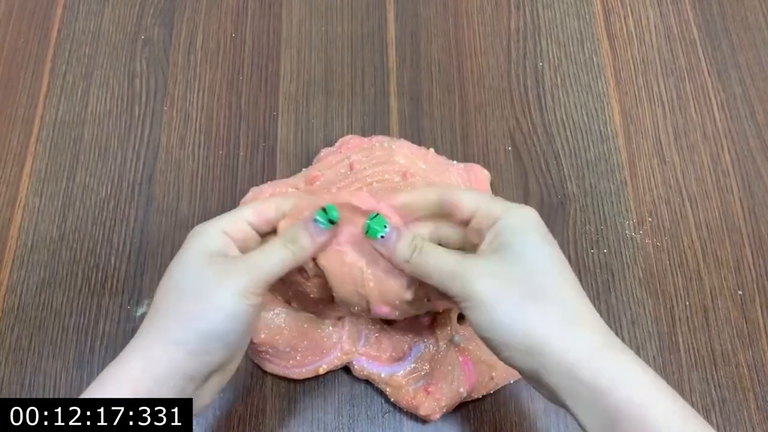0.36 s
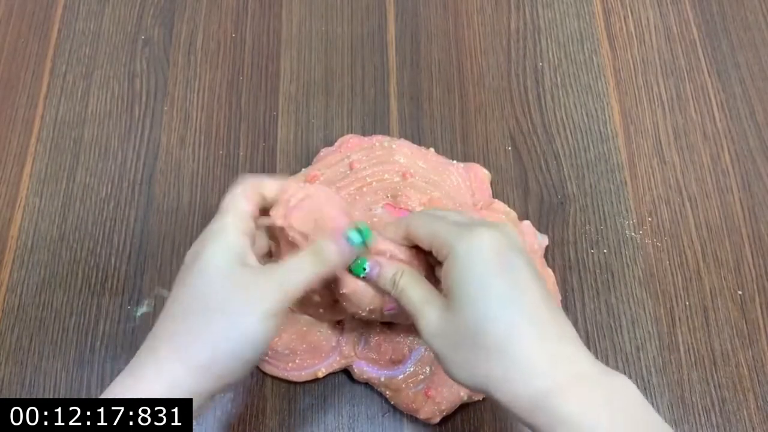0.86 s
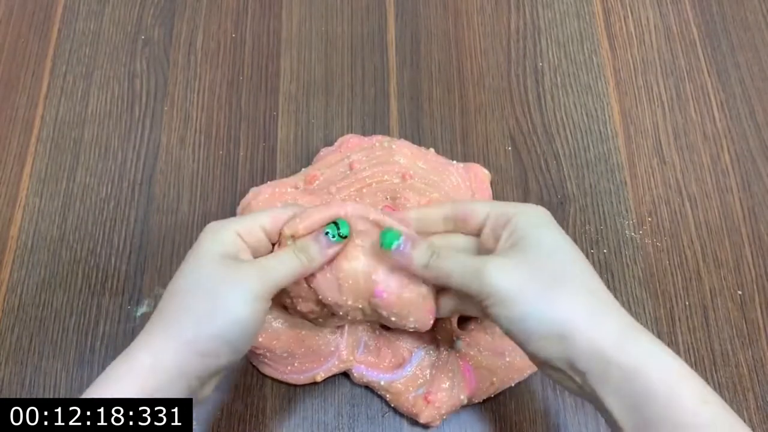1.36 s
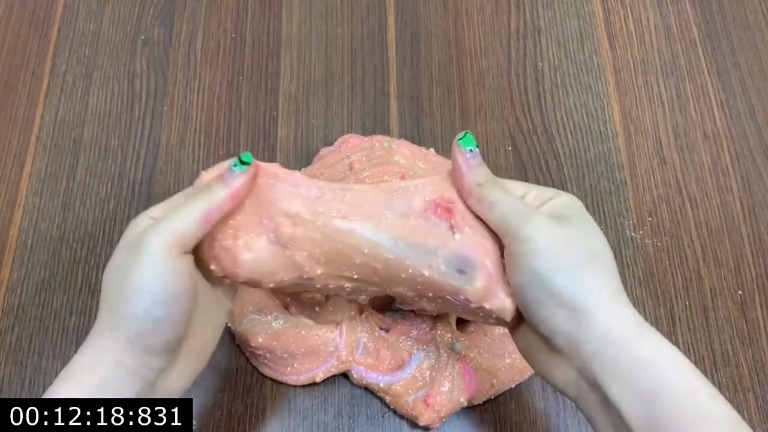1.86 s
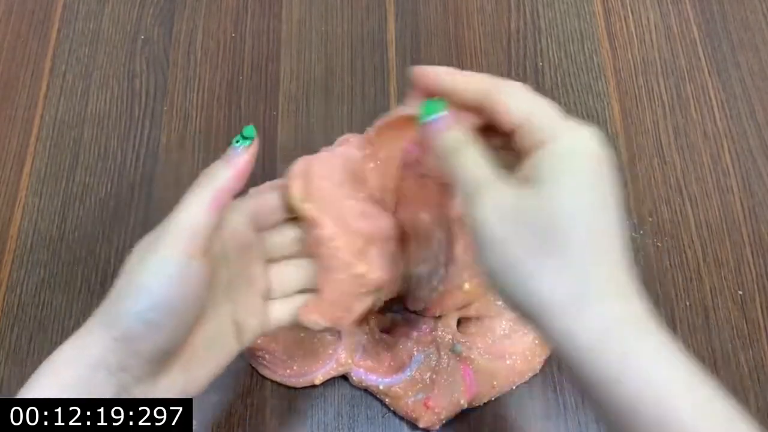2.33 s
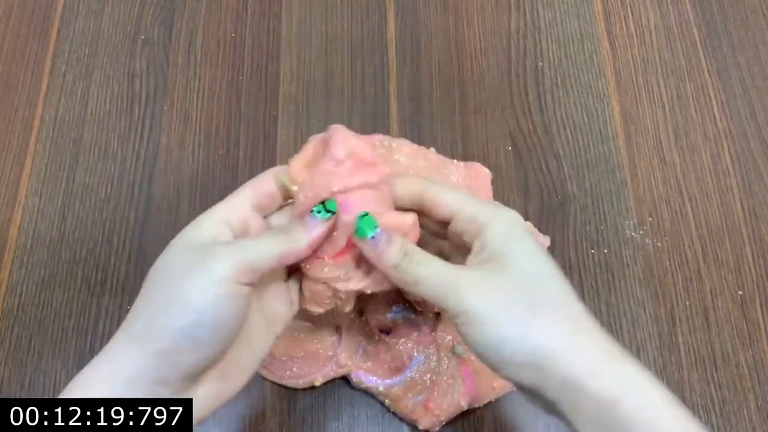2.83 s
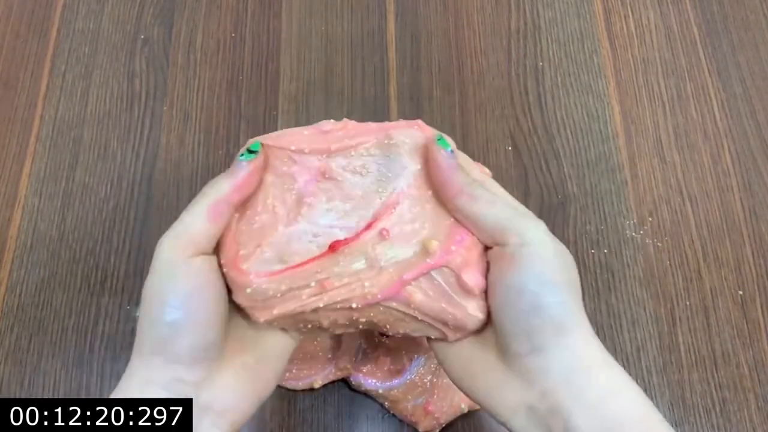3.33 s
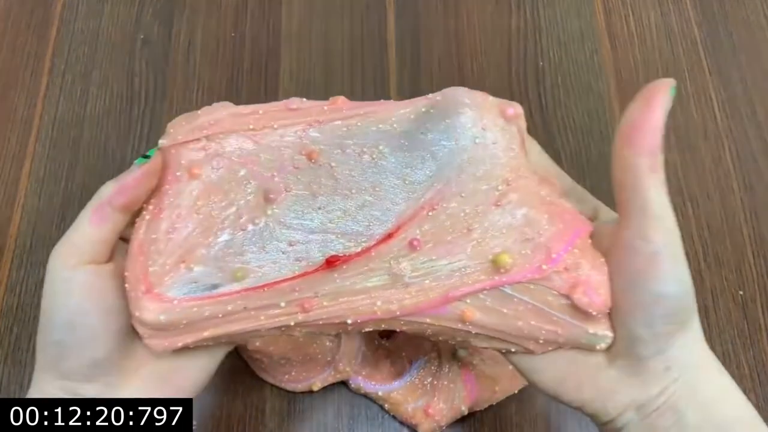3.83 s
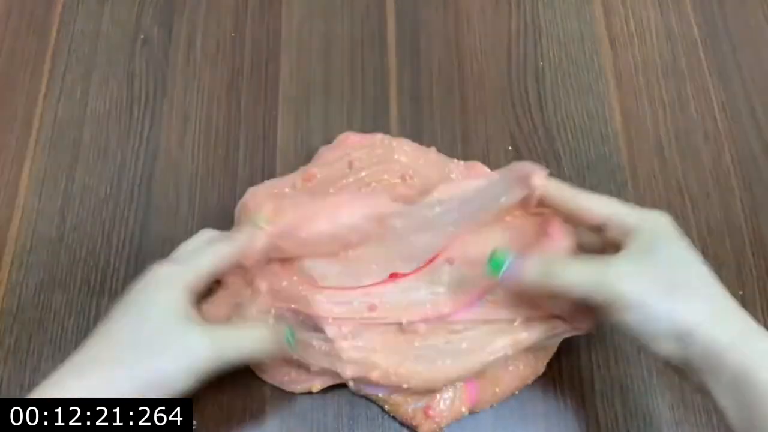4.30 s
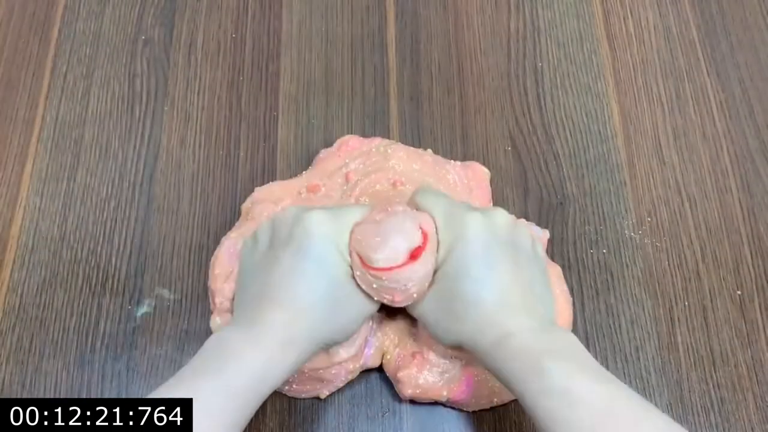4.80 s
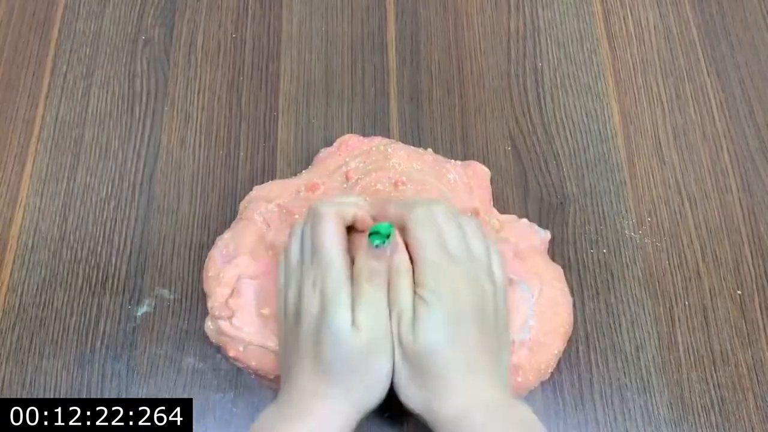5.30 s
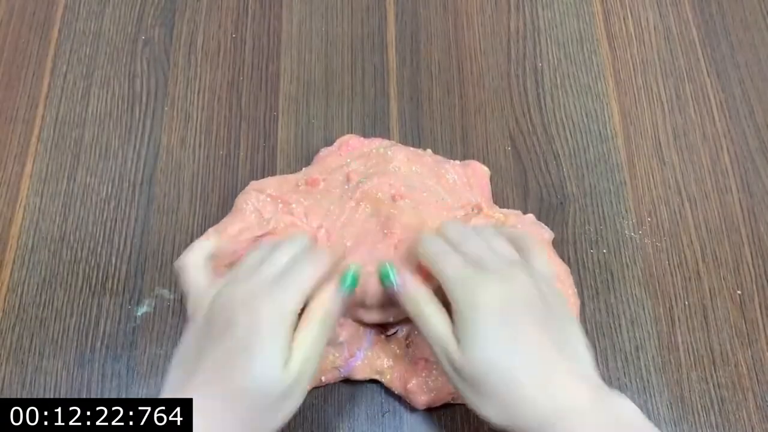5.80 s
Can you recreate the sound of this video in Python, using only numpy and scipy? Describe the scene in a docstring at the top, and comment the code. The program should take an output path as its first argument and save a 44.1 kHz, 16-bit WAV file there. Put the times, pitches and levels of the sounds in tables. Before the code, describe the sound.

Slime is stretched and folded by hand, mostly quiet, with delicate sticky ticks and small bubble pops over a soft hush. One brighter double snap stands out early. After a near lull around 4 s, folding and squeezing release thick wet crackles, muffled thumps and loud bursting air pockets, heaviest near the end. The microphone is very close; short reflections and a brief small-room tail surround the pops.

```python
"""Hands stretch, fold and press soft slime on a wooden table in a small quiet room.
First come sparse pops over a soft wet crackle, then a louder cluster near 1.4 s, scattered pops after it,
and from 4.4 s dense bursts and low thuds, loudest near 5.0 s and from 5.6 s to the end.
Pops are ringing cavities with noise snaps, crackle is many tiny rings, thuds and hush are shaped noise;
echoes, table modes and a diffuse tail follow the slime to a close pair of microphone ports."""
import sys
import numpy as np
from scipy import signal
from scipy.fft import rfft, irfft, next_fast_len
from scipy.io import wavfile
from scipy.ndimage import uniform_filter1d

SR = 44100
rng = np.random.default_rng(int(sys.argv[2]) if len(sys.argv) > 2 else 0)


def gain_from_decibels(decibels):
    """Convert decibel values to linear amplitude factors."""
    exponent = np.asarray(decibels, float) / 20
    return 10 ** exponent


def transcribe(signal):
    """Save signal, clipped to [-1, 1], as a 16-bit WAV file at the path in sys.argv[1]."""
    frames = np.atleast_2d(signal).T
    limited = np.clip(frames, -1, 1)
    pcm = np.round(limited * 32767).astype(np.int16)
    wavfile.write(sys.argv[1], SR, pcm)


N = 260631  # samples

# Bursting air pockets: (time [s], cavity ring level [dB], cavity pitch [Hz],
# peak of the torn film's snap [dB], left-right ring difference, held within 8 either way [dB])
POCKETS = [(0.1826, -57, 1470, -39.5, 2), (0.2648, -48, 2490, -45.5, 2), (0.2854, -41.5, 1270, -39, 1),
           (0.289, -40.5, 2440, -50, 3), (0.319, -48, 1850, -45, 9), (0.361, -40, 1130, -61, 9),
           (0.4846, -33, 13500, -38, 2), (0.501, -37.5, 3600, -34, -6), (0.488, -43, 3180, -30, 6),
           (0.537, -45, 2470, -49, 1), (0.997, -48, 1380, -37, 7), (1.0616, -55, 3000, -38, 2),
           (1.134, -51, 10500, -42, 0), (1.168, -45, 9500, -56, -1), (1.276, -58, 2080, -60, 3.5),
           (1.3737, -54, 4620, -37, 6), (1.3778, -19, 13300, -31.5, -1), (1.444, -18.5, 1406, -27, 17),
           (1.4462, -21.5, 1155, -24, -3), (1.447, -29, 930, -50, 0), (1.447, -30, 2320, -48, 2),
           (1.679, -39.5, 1080, -44, 7), (1.687, -40.5, 1620, -32, 6), (1.694, -41, 1140, -33, -3),
           (1.9128, -48, 1440, -44.5, 9), (2.1074, -49, 1150, -46, 6.5), (2.313, -56.5, 2060, -44.5, 1.5),
           (2.3979, -35.5, 5550, -38, 10.5), (2.402, -37, 14000, -46, 1.5), (2.4071, -43, 14000, -50, 1),
           (2.597, -57.5, 2520, -44.5, 0), (2.645, -56, 2460, -51.5, 3.5), (2.7543, -42, 13500, -45.5, 2.5),
           (2.796, -50, 4600, -45, 10), (2.837, -48, 2740, -49.5, 6.5), (2.841, -38.5, 2780, -50, 14),
           (2.885, -38.5, 3600, -40.5, 2), (2.8868, -45.5, 2450, -37, -1), (3.0199, -33, 3120, -30, 8.5),
           (3.0198, -39, 1630, -26, 7), (3.2564, -55, 1730, -59, 27), (3.426, -52.5, 1320, -47, 8),
           (3.522, -48.5, 5350, -46.5, 9), (3.625, -62, 2680, -41.5, 5), (3.686, -35.5, 2500, -35, 12),
           (3.6882, -51, 1260, -62, -2), (3.7683, -49, 1140, -62.5, 3), (3.839, -55, 1180, -49, 2.5),
           (3.8526, -60, 1880, -43, 15), (4.271, -48, 3230, -67, 3), (4.3795, -47, 13500, -41, 2),
           (4.431, -51, 1700, -35, 5), (4.437, -39.5, 1590, -25, 2), (4.445, -45, 1760, -51, 10),
           (4.463, -39, 1460, -54, -3), (4.473, -39.5, 1330, -50, -5), (4.5137, -55, 390, -40.5, -1),
           (4.524, -38, 1980, -46, 5), (4.586, -42, 2000, -44.5, 7), (4.6635, -44, 1800, -40, 7),
           (4.698, -60, 3100, -25.5, 11), (4.711, -57, 5170, -27, 2), (4.7735, -48, 3700, -30, -3),
           (4.778, -37, 840, -43, -1), (4.801, -44.5, 2500, -27, 0), (4.813, -27, 13500, -26, 3),
           (4.827, -22, 1500, -20, 3), (4.828, -24.5, 800, -27, -2), (4.833, -24.5, 2500, -24, 5),
           (4.833, -31, 430, -42.5, -5), (4.846, -22.5, 3080, -30, 3), (4.857, -21.5, 3300, -25.5, -1),
           (4.914, -29, 3200, -26, 2.5), (4.9292, -15, 3050, -22, -2), (4.9389, -23, 3420, -22.5, 9.5),
           (4.933, -33, 338, -40, -2), (4.9662, -25, 13000, -29, 0), (4.9727, -17, 9900, -19, 2),
           (4.9915, -34.5, 430, -28, -1), (5.0209, -6, 1480, -4, -1), (5.0225, -16, 488, -40, 1.5),
           (5.0226, -8, 1280, -3, 8), (5.0253, -20.5, 840, -22, -2), (5.255, -26, 2650, -23, 4),
           (5.27, -32, 2730, -31, 2), (5.282, -39, 2480, -42, 1), (5.5505, -31.5, 13000, -35, -1),
           (5.555, -32.5, 990, -46, -2), (5.5647, -25.5, 1130, -22, 2), (5.5655, -26, 470, -24.5, -1),
           (5.6089, -9.5, 1770, -5, 3), (5.6098, -23.5, 550, -36, 0), (5.6111, -17.5, 1460, -5, 0),
           (5.6191, -4.5, 4220, -9, -12), (5.619, -18, 468, -27, -1.5), (5.6245, -17.5, 700, -32, -1),
           (5.627, -29, 1160, -30, 0), (5.6435, -29, 13500, -36, 1), (5.685, -27, 13000, -26, 1),
           (5.6894, -27.5, 870, -17, 4.5), (5.7262, -16, 4230, -18, 7), (5.7303, -28, 2520, -11, 8),
           (5.7392, -4, 2270, -8, 3), (5.7412, -14.5, 460, -29, -0.5), (5.7419, -5, 2200, -3, -1),
           (5.7425, -17.5, 705, -32, -1), (5.7514, -7, 12400, -4, -1), (5.7545, -32, 457, -11, 0)]


def pops():
    """Cavity resonance: each pocket rings while its film tears in a short bright snap of noise."""
    snap_likeness, snap_decay_s, snap_band_hz = 0.87, 0.00046, (6000, 16000)
    cycles_at_1khz, cycles_per_octave = 0.73, 0.97  # ringing cycles; factor per octave up
    cycles_per_20_db = 1.61  # gentler pops ring longer by this factor
    out = np.zeros((2, N + SR))
    t = np.arange(400) / SR
    bright = signal.butter(1, snap_band_hz, "band", fs=SR, output="sos")
    noises = rng.standard_normal((len(POCKETS), 2, 400))
    for (s, db, hz, snap_db, pan_db), noise in zip(POCKETS, noises):
        at = round(s * SR)
        half_db = np.clip(pan_db, -8, 8) / 2
        cycles = cycles_at_1khz * cycles_per_octave ** np.log2(hz / 1000)
        cycles *= cycles_per_20_db ** (-db / 20)
        # each pop carries little sound below its own pitch
        radiation = signal.butter(4, 0.61 * hz, "high", fs=SR, output="sos")
        ring = signal.sosfilt(radiation, bubble(hz, cycles))
        noise = np.array([noise[0], partly_alike(noise[0], noise[1], snap_likeness)])
        snap = signal.sosfilt(bright, noise * t * np.exp(-t / snap_decay_s))
        out[:, at:at + len(ring)] += gain_from_decibels([[db + half_db], [db - half_db]]) * ring
        out[:, at:at + 400] += gain_from_decibels(snap_db) * snap / abs(snap).max()
    return out[:, :N]


# Pulls, folds and squeezes: (peak time [s], relative crackle level [dB], build by 20 dB [s],
# die by 20 dB [s], wetness as tilt toward the bass [dB per octave]);
# a build or die under .01 s, zero and negative included, acts as .01 s: a nearly abrupt start or stop
KNEADING = [(0.052, -72.5, 12.5, 0.36, 7), (0.189, -58.5, 0.07, 0, 5.5), (0.29, -57, 0.1, 0.09, 5),
            (0.471, -56, 0.06, 0.08, -2.5), (0.501, -48, 0.05, 0.07, 0.5), (0.536, -47.5, 0.09, -0.0333, 1),
            (0.655, -64, 0.13, 0.05, 2.5), (0.974, -53.5, 0.01, 0.22, 0), (1.053, -48.5, 0.08, 0.06, 1),
            (1.139, -60.5, 0.2, 0.02, -0.5), (1.344, -59.5, 0.02, 0.14, -2), (1.379, -48.5, 0.06, 0, -1.5),
            (1.446, -41.5, 0.0131, 0.0443, 2.5), (1.479, -51.5, 0.014, 0.37, 6),
            (1.682, -57, 0.12, 0.14, 8.5), (1.689, -45.5, -0.02, 0.03, -5), (1.845, -60, 0.1, 0.1, -3),
            (1.936, -50, 0.03, 0, -3), (2.082, -59.5, -0.08, 0.06, 5), (2.123, -59.5, 0.32, 0, 5),
            (2.32, -61.5, 0.1, 0.14, -2.5), (2.368, -53.5, 0.04, 0.11, 1.5),
            (2.405, -50.5, 0.02, -0.04, -3), (2.6, -64.5, 0.1, 0.4, 2.5), (2.67, -56, 0.1, 0.11, 0),
            (2.795, -52.5, 0, 0.29, -2), (2.847, -50.5, -0.03, 0, -0.5), (2.981, -55, 0.15, 0.08, -1),
            (3.096, -50.5, 0, 0.07, 2), (3.199, -57, 0.05, 0.12, 1), (3.278, -58.5, 0.15, 0.12, 2),
            (3.38, -64.5, 0.04, 0.25, -2.5), (3.426, -57, -0.08, 0.11, 0), (3.529, -64, .07, 0.1, 4.5),
            (3.611, -61, 0.015, 0.12, -3), (3.689, -55, 0.03, 0.04, 2.5), (3.85, -51.5, 0.025, 0.07, 1.5),
            (4.14, -71.5, 0.2, -0.2, 5), (4.28, -66, 0.23, 0, 6.5), (4.35, -71.5, 0.4, 0.5, -8.5),
            (4.43, -42, 0.0158, 0, 1.5), (4.521, -46.5, 0.1, 0.03, 5.5), (4.581, -42.5, 0.08, -0.03, 1),
            (4.7, -50.5, 0.09, 3.5, 5.5), (4.77, -46, 0.02, 0.2, -1), (4.838, -32.5, -0.01, 0.04, 4.5),
            (4.875, -38, 0.05, 0.07, 4), (4.93, -36.5, 0.0631, 0.16, 3.5), (5.0, -45, 0.16, 0.43, -7.5),
            (5.08, -35.5, 0.1, 0.02, 0.5), (5.202, -34, 0.19, -0.02, 3), (5.233, -28.5, 0.0955, 0.08, 4),
            (5.285, -32.5, 0.1756, -0.01, 4), (5.33, -50, 0.18, -0.14, 4), (5.565, -33, -0.05, 0.1, 0),
            (5.616, -26, -0.0053, 0.25, 3), (5.67, -32.5, 0, 0.25, -3),
            (5.729, -19.5, -0.0018, 0.0344, 2.5), (5.754, -26, -0.0035, 0.05, -2),
            (5.81, -36.5, 0.06, 0.6, 2.5)]
# Relative spectrum of the tiny bubbles: (frequency [Hz], level [dB per Hz])
CRACKLE_SPECTRUM = [(200, -21.5), (400, -22.5), (850, -22), (1200, -11), (2000, -12), (3000, -8.5),
                    (4400, -10.5), (7500, -5.5), (10000, -9), (13000, -12), (15500, -4.5)]


def crackle():
    """Random point process: tiny bubbles burst in clumps under each stroke; wetter slime favours low ones."""
    bursts_per_s, rest_db = 11000, -93.5  # rate before the pitch weighting; crackle at rest
    spread_db, clump_db = 3.5, 2.5  # scatter of bubble sizes; bunching in time
    patch_db, patch_s = 3, 0.039  # neighbouring sizes come and go together
    power = strokes(*np.transpose(KNEADING)[:4])
    total = power.sum(0) + gain_from_decibels(2 * rest_db)
    crackle_db = at_samples(10 * np.log10(total))
    wet_db = at_samples(np.transpose(KNEADING)[4] @ power / total)
    clumps = evened(uniform_filter1d(uniform_filter1d(rng.standard_normal(N), 200), 200))
    pitches = np.geomspace(220, 15500, 36)
    width = max(round(patch_s * SR / 64), 1)
    patches = uniform_filter1d(rng.standard_normal((N // 64 + 1, len(pitches))), size=6, axis=1)
    patches = uniform_filter1d(uniform_filter1d(patches, width, axis=0), width, axis=0)
    patches = evened(patches).T
    out = np.zeros((2, N))
    for hz, patch in zip(pitches, patches):
        often = bursts_per_s / len(pitches) * (hz / 2500) ** .7  # small bubbles are the most common
        at = np.flatnonzero(rng.random(N) < often / SR)
        size_db = spread_db * np.minimum(rng.exponential(1, len(at)), 4)
        size_db += clump_db * clumps[at] + patch_db * patch[at // 64]
        level_db = crackle_db[at] + read(CRACKLE_SPECTRUM, hz) + size_db
        level_db += wet_db[at] * np.log2(4000 / hz)
        # bubbles lie left and right
        side_db = 6.0 * (1 - likeness(hz)) * rng.standard_normal(len(at))
        # some below 8 kHz reach the right port a sample late
        lag = rng.integers(0, 3, len(at)) // 2 * (hz < 8000)
        late = np.minimum(at + lag, N - 1)
        train = np.zeros((2, N))
        train[0, at] = gain_from_decibels(level_db + side_db) * np.sqrt(hz / often)
        train[1, late] = gain_from_decibels(level_db - side_db) * np.sqrt(hz / often)
        grain = bubble(hz, 3.5)
        grain = grain / np.linalg.norm(grain)
        out += signal.oaconvolve(train, grain[None], axes=1)[:, :N]
    return gain_from_decibels(-3.5) * out


def bubble(hz, cycles, rise=0.043):
    """Damped oscillation: a small cavity rings down, its pitch rising as it opens; peak 1."""
    cycles = max(cycles, .3)
    turns = np.arange(int(SR * (cycles * 3 + 1) / hz)) * hz / SR
    fade = (1 - np.exp(-turns * 4)) * np.exp(-turns / cycles)
    ring = fade * np.sin(2 * np.pi * turns * (1 + rise * turns / cycles))
    return ring / abs(ring).max()


# Wet folds closing: (peak time [s], squelch level [dB], die by 20 dB [s]);
# a die under .01 s acts as .01 s, a nearly abrupt stop
FOLD_CLOSINGS = [(0.45, -73.5, 0.8), (1.7, -56, 0.21), (2.12, -61.5, 0.07), (2.63, -68, 0.38),
                 (2.86, -60, 0), (3.87, -57, 0.08), (4.23, -67.5, 0.2), (4.48, -50, 0.085),
                 (4.56, -47, 0.1), (4.68, -55.5, 0.04), (4.79, -51.5, 0.1), (4.94, -46, 0.1),
                 (5.02, -36.5, 0.08), (5.1, -52.5, 0.22), (5.22, -35.5, 0.14), (5.64, -44.5, 0.32),
                 (5.74, -35, 0.0758), (5.91, -54, 0.5)]
# Relative squelch spectrum: (frequency [Hz], level [dB per Hz])
SQUELCH_SPECTRUM = [(100, -24.5), (170, -3.5), (280, 3), (430, 0.5), (600, -3), (1000, -10.5),
                    (2000, -57.5)]


def squelch():
    """Shaped noise under an envelope: wet folds squelch as they close."""
    return leaning(FOLD_CLOSINGS, -77) * shaped_noise(SQUELCH_SPECTRUM, 2048)


# Arms leaning on the table top: (peak time [s], rumble level [dB], die by 20 dB [s]);
# a die under .01 s, zero and negative included, acts as .01 s, a nearly abrupt stop
ARM_BUMPS = [(0.1, -68, 0.5), (0.67, -70, 0.5), (1.0, -66, -0.1), (1.68, -64.5, 0.96), (2.12, -55.5, 0.1),
             (2.57, -55, 0.18), (2.63, -57.5, 0.07), (2.68, -60, 0.12), (2.88, -59, 0.14),
             (3.05, -66.5, 1.4), (3.865, -60, 0.06), (3.925, -51, 0.06), (4.23, -63.5, 0.9),
             (4.55, -50, 0.08), (4.62, -53, 0.04), (4.87, -57, 0.2), (5.31, -44, 0.23),
             (5.355, -47.5, 0.22), (5.4, -56.5, 0.05), (5.7, -54.5, 0.2), (5.82, -64.5, 0)]
# Relative rumble spectrum: (frequency [Hz], level [dB per Hz])
RUMBLE_SPECTRUM = [(12, -33), (20, -0.5), (50, 2.5), (75, -5), (130, -12.5), (210, -42), (350, -120)]


def rumble():
    """Structure-borne sound: the arms' weight rumbles through the wood as low noise."""
    return leaning(ARM_BUMPS, -73.5) * shaped_noise(RUMBLE_SPECTRUM, 2048)


# Palms pressing flat: (peak time [s], boom level [dB], die by 20 dB [s])
PALM_PRESSES = [(4.52, -46, 0.1356), (4.61, -49.5, 0.13), (4.99, -51, 0.26), (5.05, -52, 0.33)]
# Relative boom spectrum: (frequency [Hz], level [dB per Hz])
BOOM_SPECTRUM = [(70, -32), (105, 1.5), (140, -30.5)]


def boom():
    """Low resonance as narrow-band noise: the whole table booms under flat palms."""
    return leaning(PALM_PRESSES, -99) * shaped_noise(BOOM_SPECTRUM, 2048)


def leaning(rows, rest_db):
    """Summed stroke power, as a gain: loads build in 0.56 of their dying time, neither under .01 s."""
    s, db, die_s = np.transpose(rows)
    power = strokes(s, db, 0.56 * die_s, die_s).sum(0)
    return at_samples(np.sqrt(power + gain_from_decibels(2 * rest_db)))


def strokes(s, db, build_s, die_s):
    """Exponential growth and decay: each stroke's power moves straight in dB to and from its peak."""
    t = np.arange(0, N + 64, 64)[:, None] / SR - s
    # shorter times act as .01 s: a nearly abrupt start or stop
    dying = t / np.maximum(die_s, .01)
    building = -t / np.maximum(build_s, .01)
    return gain_from_decibels(2 * (db - 20 * np.maximum(dying, building))).T


def at_samples(v):
    """Linear interpolation of values given every 64 samples."""
    return np.interp(np.arange(N), np.arange(len(v)) * 64, v)


# Table-top modes: (frequency [Hz], relative level [dB], time to die by 60 dB [s])
TABLE_MODES = [(289, -18, 0.43), (505, -16.5, 0.4), (630, -26.5, 0.16), (795, -25.5, 0.33)]


def table(x):
    """Modal resonance: the table top rings briefly on its modes under the bursting slime."""
    t = np.arange(SR // 2) / SR
    ring = sum(gain_from_decibels(db - 60 * t / t60) * np.sin(2 * np.pi * hz * t) for hz, db, t60 in TABLE_MODES)
    return gain_from_decibels(-39.0) * signal.fftconvolve(x, ring)[:N]


# Echoes off table and hands, one list for the left and one for the right: (delay [s], level [dB])
NEAR_ECHOES = [
    [(.0013, -30.5), (.0027, -8), (.0042, -6)],
    [(.0017, -13.5), (.0031, -41), (.0049, -12)],
]


def nearby(x):
    """Early reflection: table top and hands return dulled echoes, unlike on both sides."""
    dull = signal.sosfilt(signal.butter(1, 7000, fs=SR, output="sos"), x)
    out = np.zeros((2, N))
    for side, echoes in enumerate(NEAR_ECHOES):
        for s, db in echoes:
            lag = round(s * SR)
            out[side, lag:] += gain_from_decibels(db) * dull[:N - lag]
    return out


# Reverberation time: (frequency [Hz], time to die by 60 dB [s])
ROOM_T60 = [(250, .35), (1000, .42), (2500, .4), (6000, .33), (12000, .24), (15000, .17)]
# Reverberant energy against the direct sound: (frequency [Hz], level [dB])
ROOM_ENERGY = [(300, -12.5), (600, -10), (900, -4.5), (1500, -7.5), (3000, -6.5), (4000, -6), (5300, -7),
               (8000, -9), (12000, -13)]


def room(x):
    """Reverberation: sparse random-sign taps swell, then die band by band, partly alike on both ports."""
    swell_s = .012
    taps = np.zeros((2, SR // 2))
    at = np.arange(120, SR // 2 - 20, 20)
    at = at + rng.integers(0, 20, (2, len(at)))
    np.put_along_axis(taps, at, rng.choice([-1., 1.], at.shape), 1)
    taps *= 1 - np.exp(-np.arange(SR // 2) / SR / swell_s)
    hz, t, z = signal.stft(taps, SR, nperseg=256)
    z[1] = partly_alike(z[0], z[1], likeness(hz)[:, None])
    z *= gain_from_decibels(-60 * t / read(ROOM_T60, hz)[:, None])
    z /= np.linalg.norm(z[0], axis=1, keepdims=True)
    # the uncoloured tail sets the scale of the coloured one
    flat = signal.istft(z, SR, nperseg=256)[1]
    tail = signal.istft(z * gain_from_decibels(read(ROOM_ENERGY, hz))[:, None], SR, nperseg=256)[1]
    return signal.fftconvolve(x[None], tail / np.linalg.norm(flat[0]), axes=1)[:, :N]


# Relative spectrum of the hush: (frequency [Hz], level [dB per Hz])
AIR_SPECTRUM = [(12, -6.5), (25, -2), (75, -1), (218, -7.5), (521, -39), (1000, -22.5), (1790, -26),
                (5000, -26), (9950, -28), (14700, -28), (16500, -32)]


def air():
    """Stationary noise: the steady hush of the room and the microphone."""
    return gain_from_decibels(-72.5) * shaped_noise(AIR_SPECTRUM, 1024)


def shaped_noise(spectrum, size):
    """Diffuse field: two partly alike Gaussian noises of the given spectrum, rms 1."""
    hz = np.fft.rfftfreq(size, 1 / SR)
    frames = N // (size // 4) + 5
    a, b, c, d = rng.standard_normal((frames, len(hz), 4)).T
    left = a + 1j * b
    right = partly_alike(left, c + 1j * d, likeness(hz)[:, None])
    z = np.array([left, right]) * gain_from_decibels(read(spectrum, hz))[:, None]
    return evened(signal.istft(z, nperseg=size, noverlap=size * 3 // 4)[1][:, :N])


# Coherence of diffuse sound at the two ports: (frequency [Hz], likeness [0 to 1])
PORT_LIKENESS = [(60, .97), (300, .93), (700, .75), (1500, .45), (4000, .35), (8000, .6), (12500, .96),
                 (16000, .85)]


def likeness(hz):
    """Spatial coherence: how alike diffuse sound is at the two ports."""
    return read(PORT_LIKENESS, hz)


def partly_alike(first, other, same):
    """Correlation mixing: blends two independent signals to the given likeness with the first."""
    return same * first + np.sqrt(1 - same ** 2) * other


def evened(x):
    """Root-mean-square normalisation: scales to rms 1."""
    return x / np.sqrt(np.mean(x ** 2) + 1e-20)


def read(points, hz):
    """Logarithmic frequency scale: interpolates a spectrum table along it."""
    f, value = np.transpose(points)
    return np.interp(np.log(hz + 1), np.log(f + 1), value)


# Phase between the ports; half a turn cancels in the sum: (frequency [Hz], lead of the left [rad])
PORT_LEAD = [(0, 0), (1460, -.2), (3500, 1.4), (5000, 1.85), (6500, 2.3), (7700, 3.1), (10100, 0),
             (11600, -1.4), (12500, -3.14), (13300, -4.9), (14500, -6.1), (16400, -6.8)]
# Level between the ports: (frequency [Hz], left-right difference [dB])
PORT_LEAN = [(60, -.3), (300, .6), (700, 1.4), (1300, 2), (2400, 1.2), (5000, 0), (9000, -.8), (12500, 0)]


def ports(x):
    """Phase and level differences between two openings in one housing, then a band limit."""
    edge_hz = 15950
    size = next_fast_len(N + 4096)
    hz = np.fft.rfftfreq(size, 1 / SR)
    half = gain_from_decibels(read(PORT_LEAN, hz) / 2) * np.exp(.5j * read(PORT_LEAD, hz))
    limit = 1 / (1 + (hz / edge_hz) ** 80)
    return irfft(rfft(x, size) * np.array([half, 1 / half]) * limit, size)[:, :N]


def scene():
    """Superposition: close slime, its echoes and table ring, the thuds and the hush add up."""
    high_pass = signal.butter(2, 220, "high", fs=SR, output="sos")
    slime = signal.sosfilt(high_pass, pops() + crackle())
    middle = slime.mean(0)
    reflected = nearby(middle) + room(middle) + table(middle)
    thuds = squelch() + rumble() + boom()
    return slime + reflected + thuds + air()


def roll_off(x):
    """The treble ends steeply here."""
    return signal.sosfilt(signal.butter(12, 16800, fs=SR, output="sos"), x)


def record(dry):
    """Two-point pickup: the port pair receives the scene."""
    mix = ports(dry)
    return roll_off(mix)


dry = scene()
out = record(dry)
transcribe(out)
```